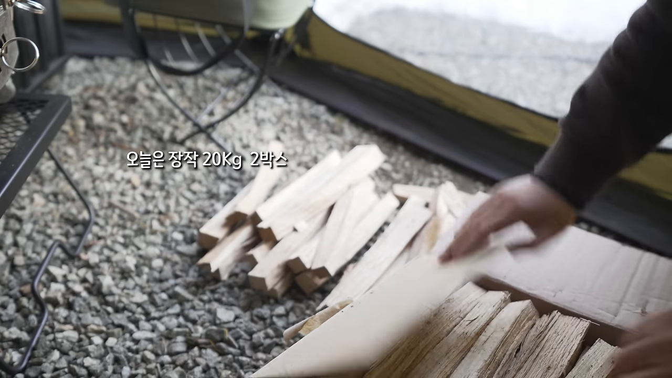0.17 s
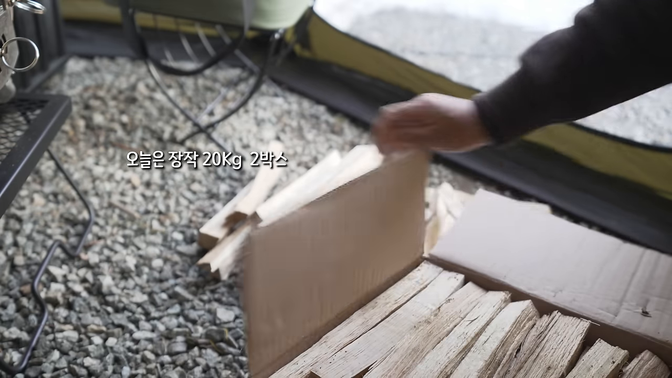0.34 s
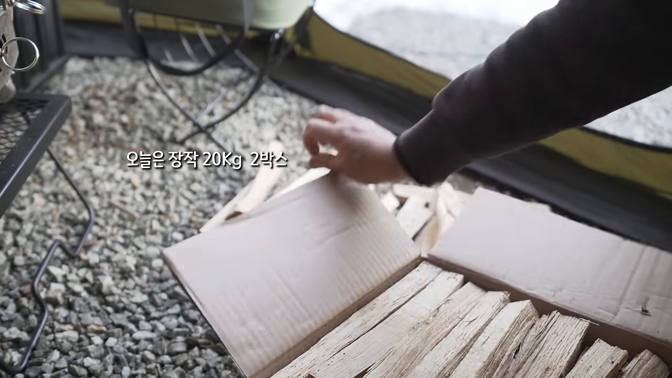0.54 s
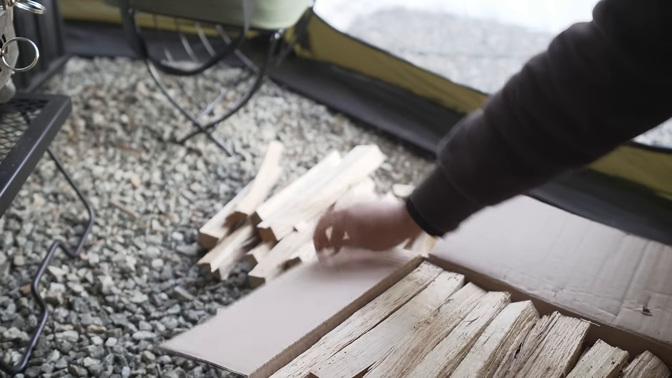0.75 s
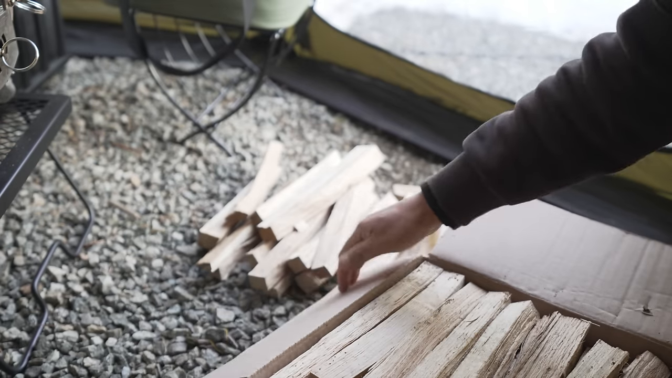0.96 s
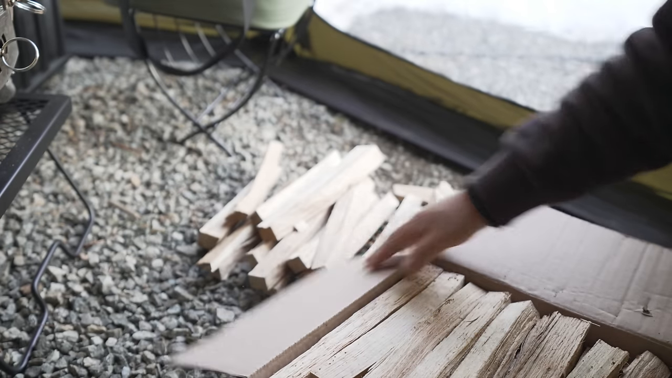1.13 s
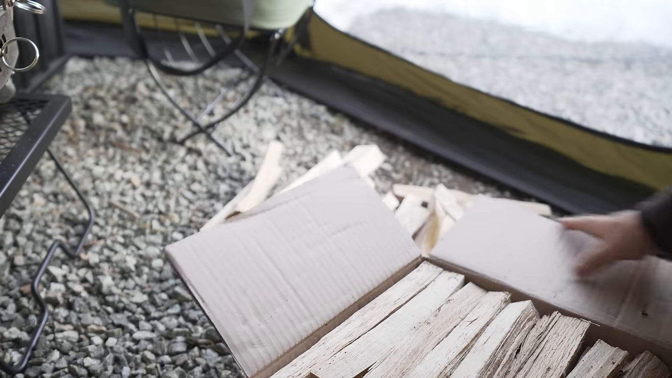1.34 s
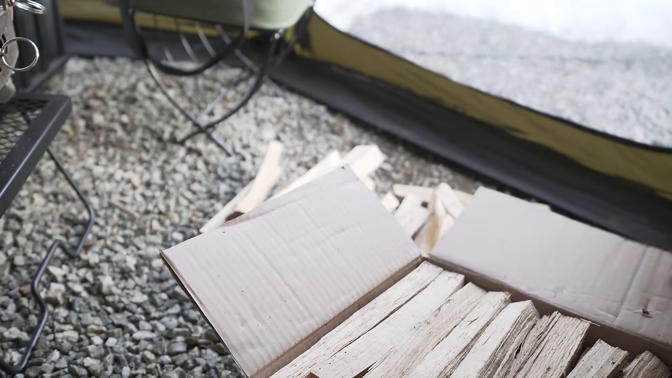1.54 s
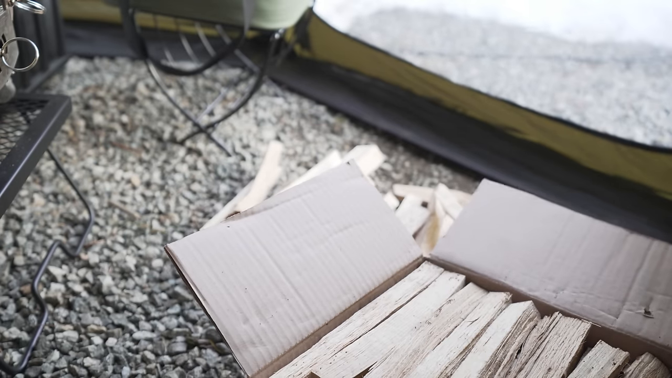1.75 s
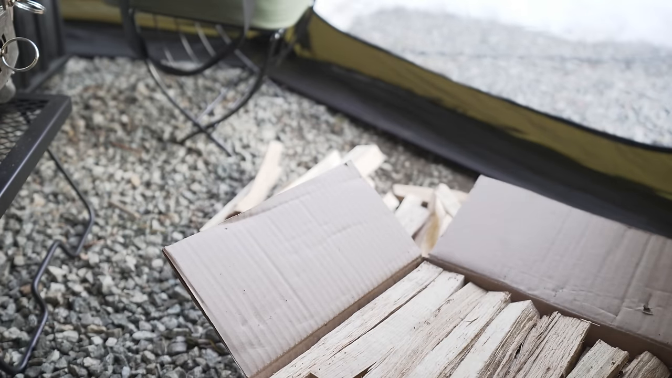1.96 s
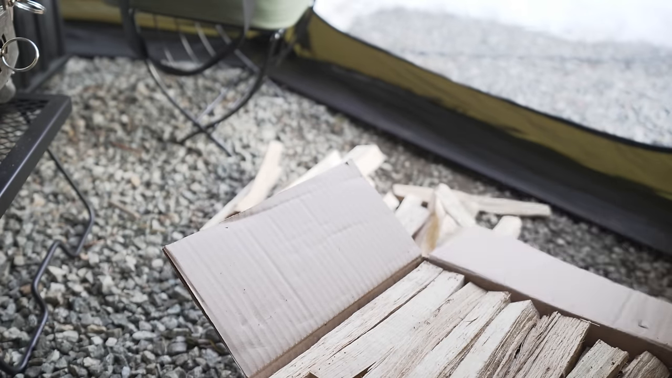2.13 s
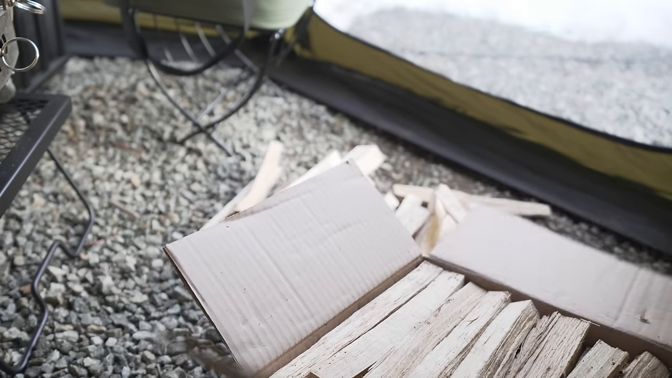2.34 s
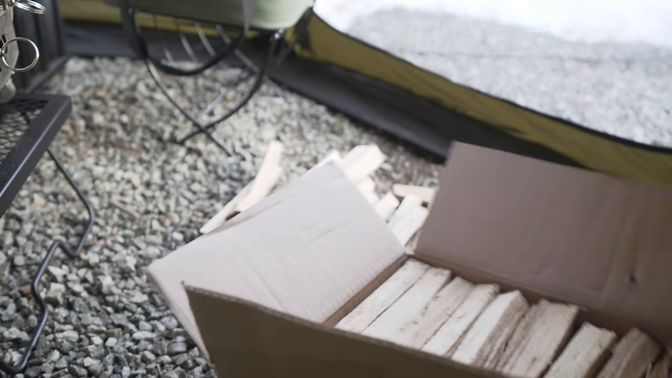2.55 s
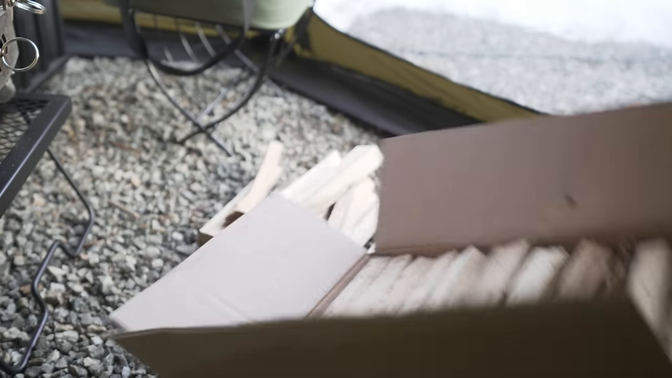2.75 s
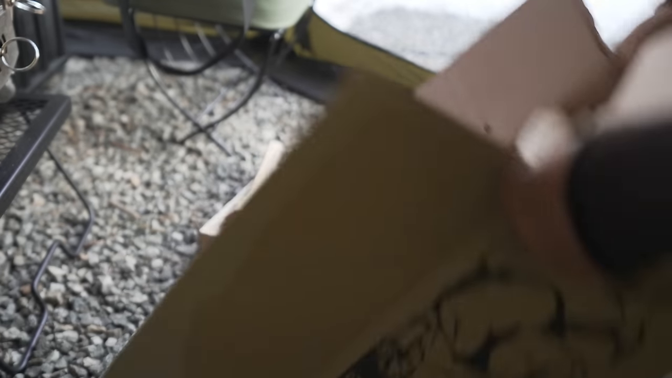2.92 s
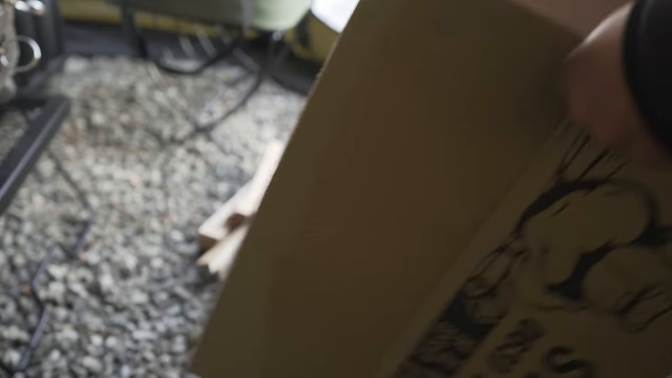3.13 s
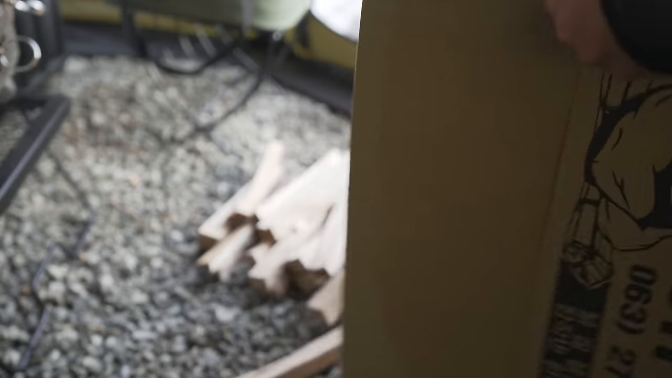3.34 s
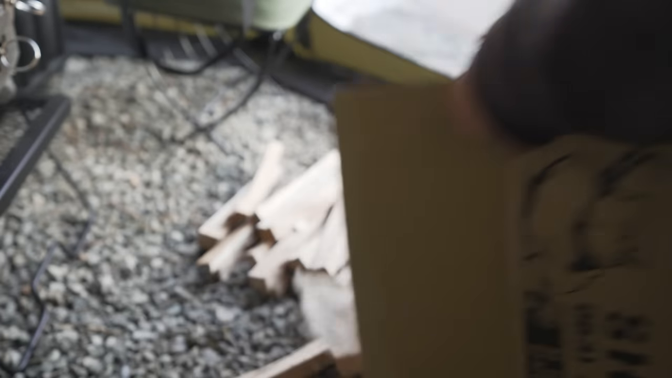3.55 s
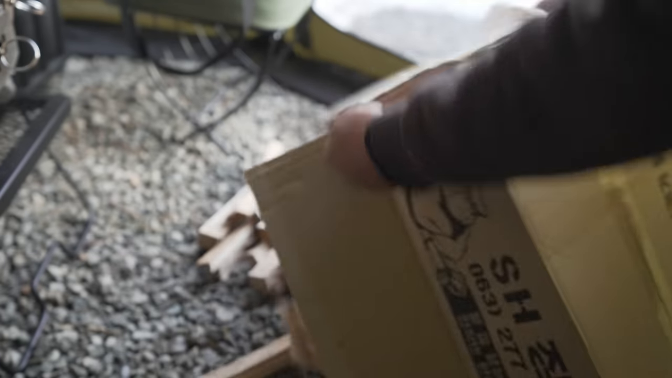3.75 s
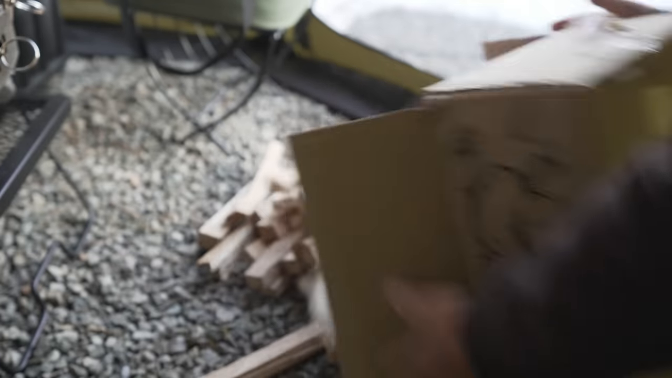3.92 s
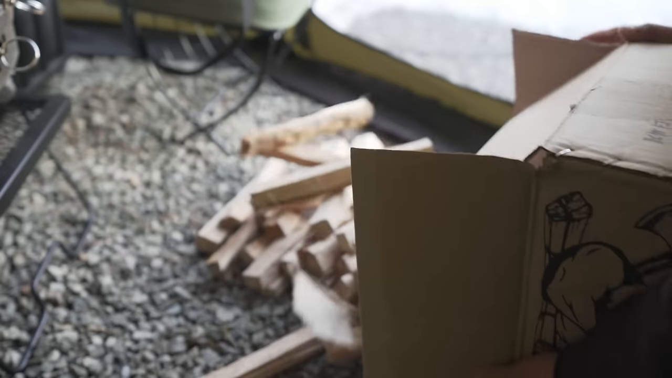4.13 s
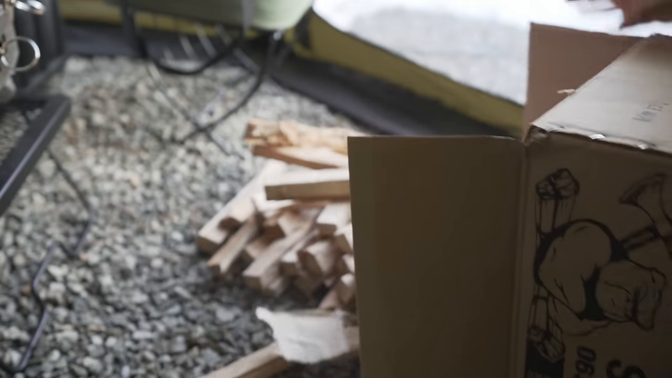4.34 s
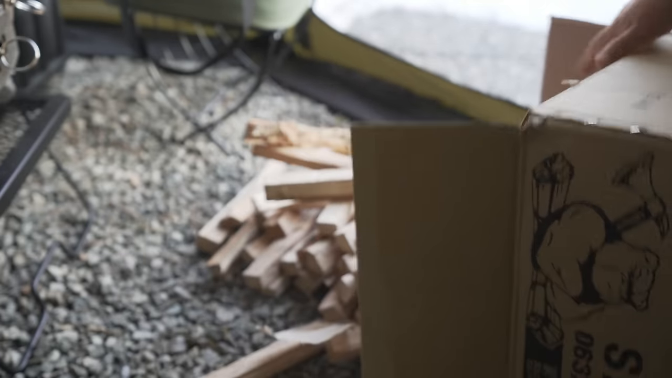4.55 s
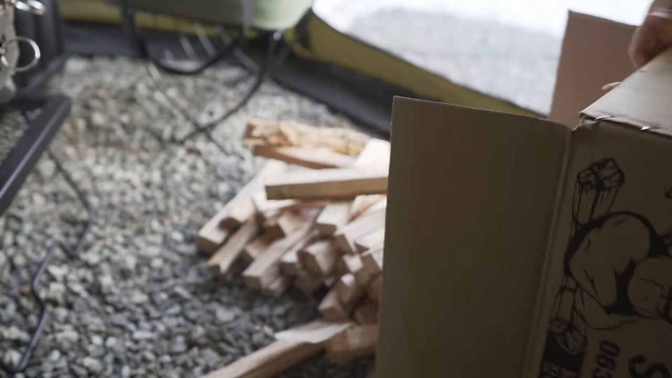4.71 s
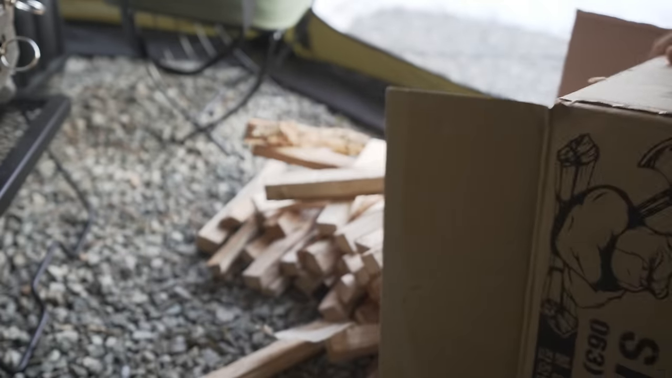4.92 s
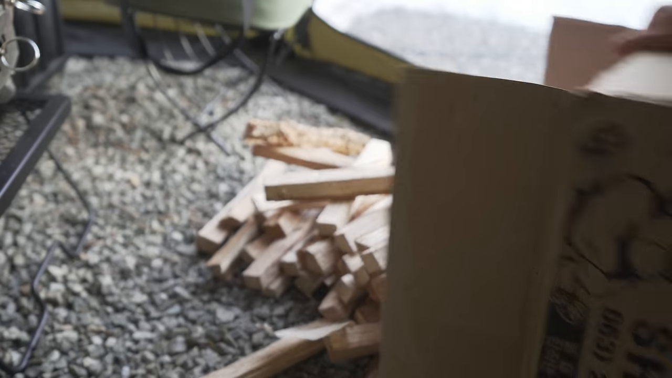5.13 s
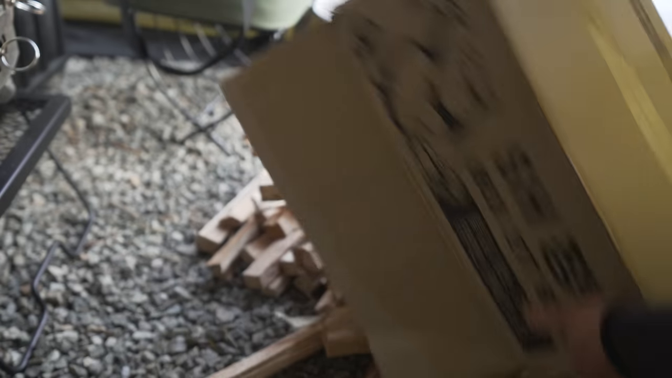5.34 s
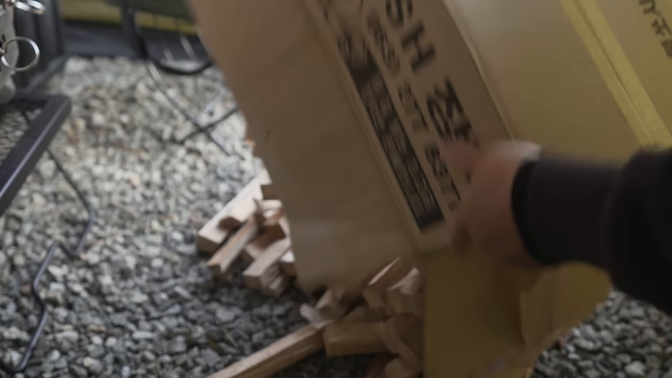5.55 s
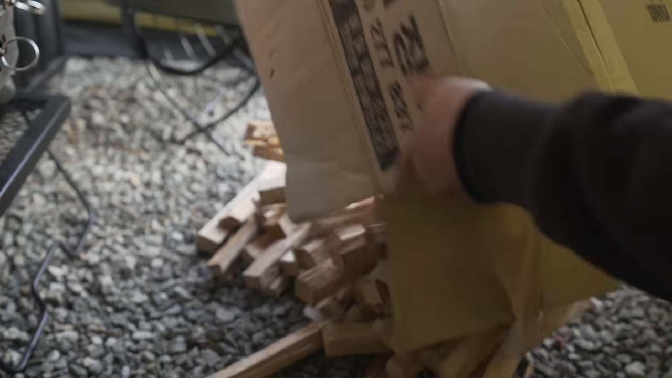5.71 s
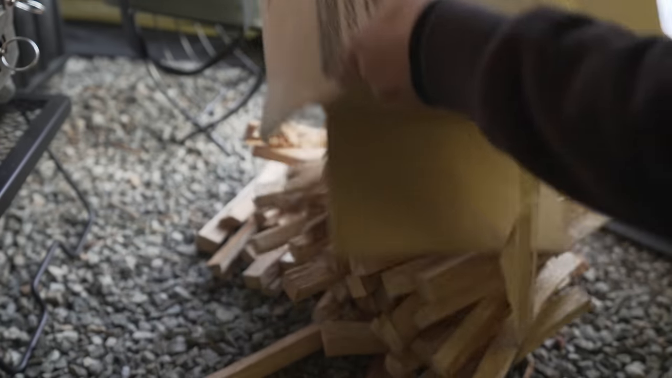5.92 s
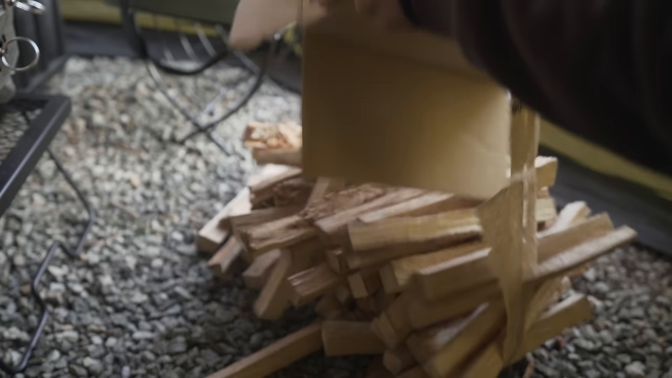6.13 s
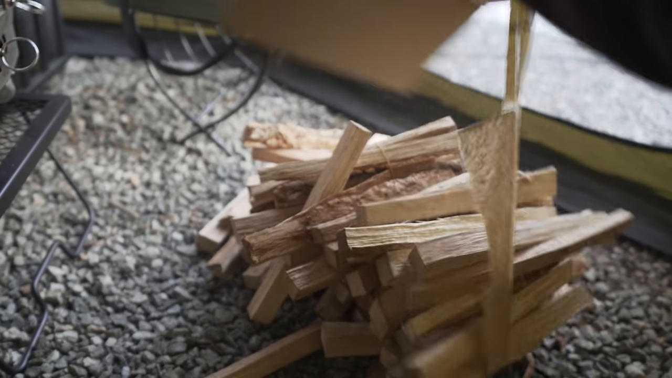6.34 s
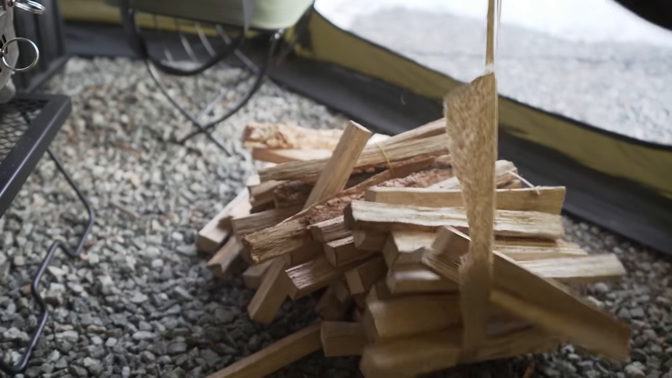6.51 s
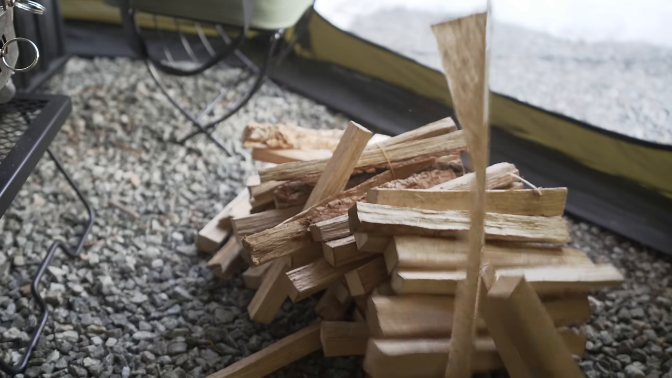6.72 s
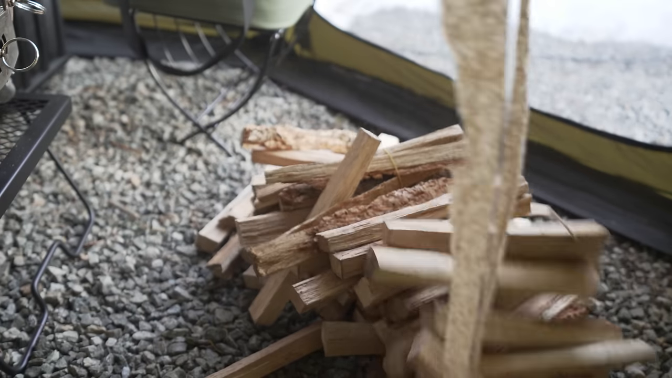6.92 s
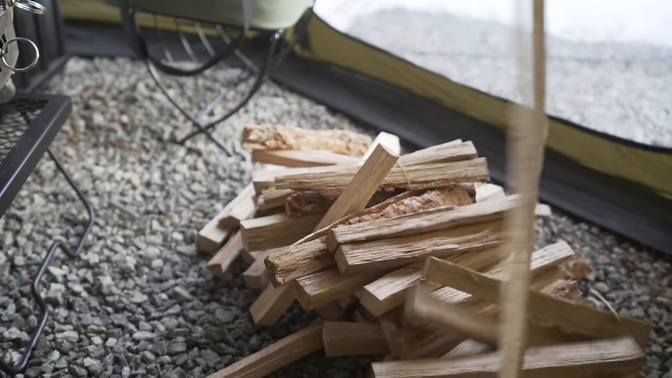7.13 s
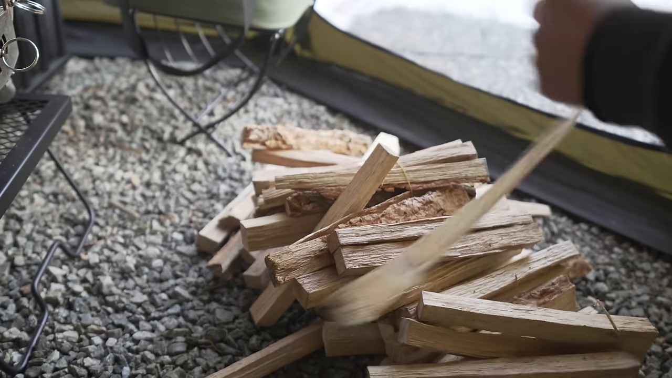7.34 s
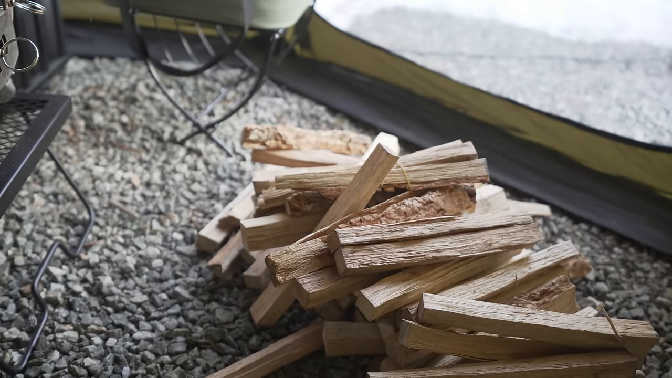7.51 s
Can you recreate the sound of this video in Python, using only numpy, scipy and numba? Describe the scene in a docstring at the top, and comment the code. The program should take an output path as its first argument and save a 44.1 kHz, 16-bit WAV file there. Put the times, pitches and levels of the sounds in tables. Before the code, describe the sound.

A cardboard box is handled, booming and rasping, before dry wood sticks knock, rattle and tumble onto a pile, close up in a tent.

```python
"""Dry woody clatter: split firewood sticks tipped from a cardboard box onto a pile on gravel, close up in a tent.
The box first booms, scuffs and rasps as it is handled; then the sticks knock, rattle and snap over it.
Knocks and panels are decaying sines; crack, thud, scuff and snap are noise bursts; rumble, rub and rasp are
shaped grit and noise. A dull tent wash and steady air lie behind, and the recorder rounds the loudest peaks."""
import sys
import numpy as np
from scipy import signal
from scipy.fft import rfft, irfft, next_fast_len
from scipy.io import wavfile
from scipy.ndimage import uniform_filter1d
from numba import njit

SR = 44100
rng = np.random.default_rng(int(sys.argv[2]) if len(sys.argv) > 2 else 0)


def put_to_file(sound):
    """Save the sound as 16-bit audio at rate SR, in the file named by the first command-line argument."""
    columns = np.atleast_2d(sound).T  # one column per channel
    safe = np.clip(columns, -1, 1)
    whole_steps = np.round(safe * 32767)
    wavfile.write(sys.argv[1], SR, whole_steps.astype(np.int16))


N = 338247

# spectrum of rough wood and card scraping: [f/Hz, relative density/dB]
RASP_SPECTRUM = [(290, -39), (500, -12.5), (1300, -3), (1770, -1), (2130, -4.5), (3750, -2.5),
                 (4660, -12.5), (8090, -12), (14000, -18.5), (16000, -21)]
WOOD_CONTACT_S = 0.00065  # build-up of a free stick's ring


def undb(db):
    """dB to amplitude."""
    return 10 ** (np.asarray(db) / 20)


def level(x, rms_db):
    """Scale to the given rms."""
    return x * undb(rms_db) / np.sqrt(np.mean(x ** 2))


def colour(x, points):
    """Filter by (f/Hz, gain/dB) points, interpolated over log frequency."""
    hz, db = np.transpose(points)
    size = next_fast_len(len(x))
    f = np.maximum(np.fft.rfftfreq(size, 1 / SR), 1)
    gain = undb(np.interp(np.log(f), np.log(hz), db))
    return irfft(rfft(x, size) * gain, size)[:len(x)]


def butter(x, order, edge_hz, kind):
    """Butterworth filter."""
    return signal.sosfilt(signal.butter(order, edge_hz, kind, fs=SR, output="sos"), x)


def band(x, low_hz, high_hz):
    """Band-pass."""
    return butter(x, 2, [low_hz, high_hz], "bandpass")


@njit
def rings(length, start_s, hz, size, t60_s, contact_s):
    """Sum of decaying sines, one per strike; each builds up while its contact lasts."""
    y = np.zeros(length)
    for k in range(len(start_s)):
        step = np.exp(2j * np.pi * hz[k] / SR - np.log(1000) / (t60_s[k] * SR))
        z = size[k] + 0j
        first = int(start_s[k] * SR)
        for n in range(first, min(first + int(t60_s[k] * SR), length)):
            y[n] += z.imag * min(1., (n - first) / (contact_s[k] * SR))
            z *= step
    return y


def bursts(s, db, t60_s):
    """Envelope that jumps at each time and decays exponentially."""
    spikes = np.zeros(N)
    np.add.at(spikes, (s * SR).astype(int), undb(db))
    return signal.lfilter([1], [1, -np.exp(-np.log(1000) / (t60_s * SR))], spikes)


def grit(rate_hz, spread_db):
    """Dense tiny slips at random times, of very uneven size; rms 1."""
    size_db = spread_db * np.minimum(rng.exponential(size=N), 4.)
    slips = rng.random(N) < rate_hz / SR
    return level(slips * undb(size_db) * rng.standard_normal(N), 0)


def flicker(rate_hz, spread_db):
    """Gain that slews between random levels, one per 1 / rate_hz."""
    k = int(SR / rate_hz)
    steps = np.repeat(rng.standard_normal(N // k + 1), k)
    return undb(spread_db * uniform_filter1d(steps, k)[:N])


def sticks(s, db, first_hz, second_hz, second_db, t60_s, contact_s):
    """A split stick bends two ways, so each of its two bending modes rings with close neighbours."""
    # modes about the first and second bending: [multiple of f, level/dB, share of t60]
    first_group = [(1, -6, 1), (.715, -18, 0.75), (1.11, -19, 0.4), (1.47, -24, 0.4)]
    second_group = [(1, -5.5, 0.56), (1.049, -9, 0.34)]
    t60_s = np.clip(t60_s, .015, .3)
    chance = np.clip(rng.standard_normal((12, len(s))), -2, 2)
    modes = [(first_hz, db, m) for m in first_group]
    modes += [(second_hz, db + second_db, m) for m in second_group]
    out = 0
    for k, (hz, group_db, (multiple, mode_db, share)) in enumerate(modes):
        loose = multiple != 1  # only neighbours vary from stick to stick
        f = hz * multiple * (1 + 0.025 * loose * chance[k])
        size = undb(group_db + mode_db + 2 * loose * chance[6 + k])
        out = out + rings(N, s, f, size, t60_s * share, contact_s + 0 * s)
    return out


def air():
    """Steady background: noise shaped by a fixed spectrum."""
    # background spectrum: [f/Hz, relative density/dB]
    air_spectrum = [(15, -42), (25, 18), (141, 14), (427, -6.5), (1070, 1.5), (3340, -56), (4870, -20),
                    (9070, -10.5), (16000, -80)]
    return level(colour(rng.standard_normal(N), air_spectrum), -48.5)


def handling():
    """Rumble, rattle and rasp levels in dB: slow course plus the power of each jolt, rising and sinking."""
    # slow course of the handling: [t/s, then relative box rumble, rattle, rasp level/dB]
    course = [(0.0, -47, -49, -51), (0.36, -53, -60, -57), (0.58, -42, -50.5, -59.5),
              (0.78, -40.5, -43.5, -50.5), (1.07, -46.5, -47.5, -56.5), (1.2, -49.5, -52, -46.5),
              (1.6, -43.5, -52, -50), (1.83, -55, -52.5, -55), (2.14, -46, -45.5, -55),
              (2.55, -45.5, -48.5, -58.5), (2.68, -41, -35, -56.5), (2.95, -31, -36.5, -41.5),
              (3.22, -38, -42, -50), (3.54, -42, -41.5, -43), (3.76, -31, -34.5, -43.5),
              (3.87, -23.5, -19, -38.5), (4.03, -27, -20, -44), (4.21, -49, -48, -55),
              (4.51, -63.5, -52.5, -59), (4.6, -41.5, -51, -52), (5.2, -44, -44, -52.5),
              (5.45, -30.5, -29.5, -41.5), (6.04, -33.5, -31.5, -46), (6.3, -41.5, -37.5, -39),
              (7.0, -47.5, -45, -62), (7.15, -39.5, -30.5, -48), (7.5, -57, -57, -43.5),
              (7.67, -54, -57, -69)]
    # jolts, box jerked or load slipping: [t/s, then relative box rumble, rattle, rasp level/dB]
    jolts = [(0.01, -54, -60, -50), (0.169, -33, -60, -47.5), (0.33, -63, -58, -45.5), (0.9, -49, -55, -57),
             (1.37, -41, -62, -59), (1.884, -41, -62, -49.5), (2.88, -27, -28, -43), (3.16, -51, -37, -44),
             (3.271, -44, -37, -40.5), (3.396, -20, -22, -33.5), (3.667, -19.5, -26.5, -35),
             (3.822, -15.5, -25, -40), (3.974, -44, -25, -26.5), (4.119, -19, -26, -39),
             (4.34, -50, -59, -46.5), (5.06, -41, -44, -42.5), (5.42, -48, -41, -37.5),
             (5.49, -29, -27, -32.5), (5.62, -21.5, -46, -37), (5.77, -28, -29, -43), (5.94, -26, -34, -31),
             (6.0, -34, -23, -32), (6.21, -32, -42, -35.5), (6.37, -53, -52.5, -39),
             (6.66, -37, -51, -38.5), (6.729, -37, -46, -36), (6.83, -50, -37, -42),
             (6.96, -56, -49, -37.5), (7.073, -34.5, -26, -41)]
    rise_db_per_s, fall_db_per_s = 264, 231
    t = np.arange(0, N, 64) / SR
    s, *slow = np.transpose(course)
    at, *peaks = np.transpose(jolts)
    since = t[:, None] - at
    shape = undb(np.where(since < 0, rise_db_per_s * since, -fall_db_per_s * since))
    levels_db = []
    for slow_db, peak_db in zip(slow, peaks):
        power = undb(2 * np.interp(t, s, slow_db)) + shape ** 2 @ undb(2 * peak_db)
        levels_db.append(np.interp(np.arange(N) / SR, t, 10 * np.log10(power)))
    return levels_db


def box(gain, count=1500):
    """Card panels boom and thud at each bump; dragged and bent, they rumble and buckle in many small pops."""
    # bumps of the box and flaps: [t/s, relative level/dB, panel f/Hz]
    bumps = [(0.045, -27, 152), (0.163, -33, 120), (0.404, -28.5, 105), (0.848, -17, 277),
             (0.893, -27.5, 175), (1.226, -30, 312), (1.252, -20, 172), (1.41, -26.5, 286),
             (1.44, -38, 383), (1.472, -31, 285), (1.511, -24, 104), (1.605, -33, 340), (1.875, -24, 126),
             (1.889, -26.5, 225), (2.068, -28.5, 181), (2.091, -30, 101), (2.133, -23.5, 180),
             (2.662, -21.5, 318), (2.811, -27, 204), (2.869, -18.5, 258), (3.005, -23, 138),
             (3.245, -5.5, 466), (3.264, -9.5, 385), (3.298, -9.5, 239), (3.469, -10, 134),
             (3.578, -15.5, 164), (3.658, -12, 181), (3.719, -11, 214), (3.761, -15, 152), (4.081, -8, 211),
             (4.565, -21.5, 106), (4.729, -28, 192), (5.06, -23, 194), (5.451, -21, 484), (5.593, -16, 127),
             (5.798, -16.5, 342), (5.938, -17, 450), (6.131, -19, 132), (6.618, -31.5, 406),
             (6.669, -28, 316), (6.706, -30, 200), (6.745, -35, 250), (6.945, -21.5, 238)]
    # card panel resonances: [f/Hz, width/Hz, level/dB]
    resonances = [(106, 570, -12), (144, 16, 2.5), (192, 103, 1), (263, 67, -1.5), (435, 260, -0.5)]
    s, db, hz = np.transpose(bumps)
    slap_hz = 250.  # bumps above it are harder: briefer contact, stronger thud; below it softer
    t60_s = 10.4 / hz  # 10.4 periods
    contact_s = 0.4 * slap_hz / hz ** 2  # 0.4 period at slap_hz
    boom = 1.35 * rings(N, s, hz, undb(db), t60_s, contact_s)
    boom += 0.3 * rings(N, s, 1.543 * hz, undb(db), 1.44 * t60_s, contact_s)

    thud_db = db + 15 * np.log10(hz / slap_hz)
    thud_envelope = uniform_filter1d(2.3 * bursts(s + 0.0011, thud_db, 0.059), size=100)
    thud = band(thud_envelope * rng.standard_normal(N), 116.0, 830.0)

    slips = grit(2000, 3.46) * flicker(25, 3.7)
    panels = 0
    for panel_hz, width_hz, panel_db in resonances:
        b, a = signal.iirpeak(panel_hz, panel_hz / width_hz, SR)
        panels = panels + undb(panel_db) * signal.lfilter(b, a, slips)
    at, size, pitch = rng.random((3, count))
    pop_hz = 91.1 * 4.5 ** pitch
    pops = rings(N, at * N / SR, pop_hz, size ** 4, 8.6 / pop_hz, 1.65 / pop_hz)
    rumble = level(level(band(panels, 36.0, 940.0), 0) + level(pops, -2.7), 0)
    return band(boom, 45.0, 3200.0) + thud + gain * rumble


def rattle(db, count=2600):
    """Sticks rub along the card; the harder they move, the more they also knock each other."""
    # spectrum of the rub: [f/Hz, relative density/dB]
    rub_spectrum = [(250, -13), (800, 4), (1300, 1.5), (2200, -2), (3300, -8), (4500, -10), (9000, -38)]
    s = rng.random(count) * (N / SR)
    chance = np.clip(rng.standard_normal((4, count)), -2, 2)
    size_db = 4.5 * np.minimum(rng.exponential(size=count), 4.)
    first_hz = 1280 * np.exp(0.2055 * chance[0])
    second_hz = 2900 * np.exp(0.1856 * chance[1])
    second_db = -5 + 3.7 * chance[2]
    t60_s = 0.1 * np.exp(0.1 * chance[3])
    ring = sticks(s, size_db, first_hz, second_hz, second_db, t60_s, WOOD_CONTACT_S)

    # the contact wanders over the card, so each half octave of the rub swells on its own
    slips = colour(grit(2500, 0.66), rub_spectrum) * flicker(35, 4.9)
    rub = 0
    for low_hz in 250 * 2 ** np.arange(0, 5, .5):
        rub = rub + band(slips, low_hz, low_hz * 2 ** .5) * flicker(28, 2.)
    knocking = 1 / (1 + undb(0.75 * (-39.5 - db)))  # 0-1, rises with level
    return undb(db) * (knocking * level(ring, 0) + (1 - 0.72 * knocking) * level(rub, 0))


def rasp(gain, rattle_db):
    """Wood and card scrape in fits and starts; fine grit comes and goes alone, coarse grit needs sliding wood."""
    card_only_db = -13.5  # coarse gain without rattle
    wood_from_db = -51.5  # rattle level that halves this cut in dB
    scrape = colour(rng.standard_normal(N) + .7 * grit(900, 4.8), RASP_SPECTRUM)
    coarse = butter(scrape, 2, 6500., "lowpass")
    fine = scrape - coarse
    wood = undb(card_only_db / (1 + undb(rattle_db - wood_from_db)))
    scrape = coarse * wood * flicker(24, 0.98) + fine * flicker(7.7, 0.25)
    return gain * level(scrape * flicker(60, 2.7), 3.03)


def scuffs():
    """Short bright brushes of a flap or hand over card: rasp-coloured noise in decaying bursts."""
    # scuffs: [t/s, relative level/dB]
    scuff_times = [(0.0428, -30), (0.1376, -30), (0.1614, -25), (0.2523, -32.5), (0.404, -30),
                   (0.7834, -27.5), (0.8945, -30), (1.228, -28), (1.361, -29), (2.617, -36), (4.5381, -38),
                   (4.6069, -28.5), (7.01, -22), (7.3615, -25), (7.6457, -30)]
    s, db = np.transpose(scuff_times)
    brush = level(colour(rng.standard_normal(N), RASP_SPECTRUM), -8.0)
    return uniform_filter1d(bursts(s, db, 0.066), size=64) * brush


def knocks(count=5):
    """Clear blows: ringing wood and a splintery crack; a jammed stick rings shorter and chatters on neighbours."""
    # knocks: [t/s, relative level/dB, first bending f/Hz, second bending f/Hz,
    #          second re first/dB, relative crack level/dB, jamming in the pile 0-1]
    blows = [(2.872, -10, 1040, 3300, -15, -30, 0.9), (3.017, -14.5, 1712, 2000, -27, -46, 0.64),
             (3.037, -12.5, 1120, 2660, -19, -53, 0.7), (3.082, -24, 1200, 2840, -1, -30, 0.3),
             (3.141, -9.5, 1733, 3230, -12, -33, 0.5), (3.16, -15.5, 1596, 3350, -7, -32.5, 0.5),
             (3.192, -22, 1330, 2000, -5, -29, 0.5), (3.317, -8, 1100, 2170, -21, -29, 1),
             (3.357, -2, 1197, 2970, -0.5, -21, 1), (3.39, -9, 1360, 2060, -2, -19, 0.46),
             (3.409, -19.5, 1790, 3560, 6.5, -41, 0.4), (3.458, -26, 1195, 2780, 7, -38, 0.4),
             (3.498, -29, 1350, 2720, 11, -44, 0.8), (3.659, -18.5, 1764, 3500, -8, -21.5, 0.5),
             (3.717, -15, 860, 3310, -3, -26, 0.95), (3.805, -8, 1350, 2170, -11, -42, 0),
             (3.818, -13, 1330, 2380, 4, -37, 0.4), (3.838, -12, 922, 2990, -13, -26, 0),
             (3.863, -4.5, 1555, 3100, -26, -29, 0), (3.908, -1.5, 1297, 2480, -9, -40, 0.76),
             (3.924, -4, 1040, 2030, -23, -45, 0.54), (3.94, -10, 1500, 2900, -12, -36, 0.3),
             (3.949, -9.5, 1810, 3340, 1, -44, 0.4), (3.975, -4, 1476, 2540, -12, -35, 0.84),
             (4.018, -4.5, 1384, 3100, -6.5, -35, 0.4), (4.095, -12.5, 1040, 3320, -13, -32, 0.6),
             (4.127, -22, 1620, 3040, 7, -37, 0.7), (4.168, -19, 1314, 2320, -4, -52, 0.3),
             (4.282, -2.5, 1252, 2880, -14, -40, 0.3), (4.771, -30, 1070, 3040, -2, -44, 0.4),
             (5.073, -36, 1450, 3750, 16, -36, 0.9), (5.478, -20, 1310, 2930, 5, -33, 0.5),
             (5.494, -14, 1300, 3000, -10, -38, 0.7), (5.509, -17, 1110, 2100, -10, -37, 0.3),
             (5.535, -10.5, 1400, 1970, -4.5, -36, 0.65), (5.56, -4, 1190, 2410, -10, -45, 0.97),
             (5.62, -10, 1140, 2980, -9, -23, 1), (5.712, -10.5, 1366, 3290, -11, -46, 0.86),
             (5.771, -8, 1130, 2530, -13, -25, 0.4), (5.818, -8, 1320, 2050, -3.5, -46, 0.76),
             (5.832, -5, 1350, 3340, -6.5, -41, 0.6), (5.843, -6, 1170, 2750, -6.5, -28, 0.7),
             (5.955, -14.5, 1093, 3350, 11, -16, 0.9), (5.972, -17.5, 1180, 3150, 8.5, -25, 0.6),
             (5.995, -9, 1910, 2920, 2.5, -20.5, 0.6), (6.019, -29, 1420, 2800, 7, -33, 0.5),
             (6.081, -12, 918, 2460, 7.5, -33, 1), (6.096, -14, 948, 2600, 7.5, -26, 0.37),
             (6.132, -17, 1350, 3380, 2, -29, 1), (6.152, -8.5, 1310, 2340, 0, -24.5, 0.46),
             (6.221, -13, 1210, 2720, -10, -40, 0.8), (6.241, -3, 1480, 2290, -9, -30, 0.5),
             (6.415, -34, 1360, 2550, 12.5, -34, 0.5), (6.438, -16.5, 1244, 2130, -5, -46, 0.6),
             (6.487, -12, 1270, 3420, -11, -31.5, 0.53), (6.515, -21, 1210, 1930, 3, -41, 0.7),
             (6.559, -20, 1320, 2010, -1.5, -33, 0.46), (6.654, -35.5, 980, 3650, 14.5, -35, 0.5),
             (6.778, -29.5, 1940, 3670, 13, -23, 0.05), (6.819, -29, 1510, 2280, 4, -42, 0.5),
             (6.847, -15, 1280, 4140, -13, -32, 1), (6.876, -9, 1322, 3070, 4.5, -20.5, 0.6),
             (6.9, -4, 1385, 3105, -3, -26.5, 0.63), (6.95, -13, 1210, 3090, 5.5, -22, 0.42),
             (7.056, -2.5, 1630, 3200, -9.5, -37, 0.93), (7.073, -2.5, 1198, 2780, -14, -25, 0.3),
             (7.109, -15.5, 1747, 2000, 2, -22, 0.23), (7.153, -18, 1620, 2860, 3.5, -32, 0),
             (7.202, -14, 1862, 2060, -13, -28.5, 0.5), (7.241, -20.5, 934, 2540, -2, -23, 0.2),
             (7.289, -12, 1062, 3280, -3, -27.5, 0.58), (7.476, -23, 1210, 3400, -7, -34.5, 0.97)]
    # spectrum of the crack: [f/Hz, gain/dB]
    crack_spectrum = [(300, -26), (1500, 12), (4000, 4.5), (8000, -5.5), (16000, -8.5)]
    s, db, first_hz, second_hz, second_db, crack_db, jammed = np.transpose(blows)
    jammed = np.clip(jammed, .02, 1)
    t60_s = 0.125 * (1 - 0.74 * jammed)
    contact_s = WOOD_CONTACT_S * (1 + 2.4 * jammed ** 2)
    wood = sticks(s, db, first_hz, second_hz, second_db, t60_s, contact_s)

    # chatter: neighbours struck up to 30 ms later, at their own pitches
    for late, size, pitch, overtone in rng.random((count, 4, len(s))):
        chatter_db = db - 1.7 * size - 3.9 * late ** 2 + 30 * np.log10(1.01 * jammed)
        chatter_first_hz = first_hz * (0.85 + .3 * pitch)
        chatter_second_hz = second_hz * (.8 + 0.296 * overtone)
        wood += sticks(s + .03 * late ** 2, chatter_db, chatter_first_hz, chatter_second_hz,
                       second_db, 0.69 * t60_s, 1.44 * WOOD_CONTACT_S)

    snap = 2.27 * uniform_filter1d(bursts(s, crack_db, 0.0058), size=24)
    splinter_tail = 0.66 * uniform_filter1d(bursts(s + 0.0012, crack_db, 0.11), size=200)
    crack = (snap + splinter_tail) * rng.standard_normal(N)
    return wood + colour(crack, crack_spectrum)


def snaps():
    """Dry snaps of splinters and tape: very short, bright noise clicks."""
    # snaps: [t/s, relative level/dB]
    snap_times = [(3.3827, -15), (3.3898, -19), (3.662, -13), (3.974, -11.5), (5.471, -22), (5.606, -21),
                  (6.205, -17), (6.2376, -21), (6.654, -22), (6.9496, -13), (7.0683, -25)]
    s, db = np.transpose(snap_times)
    envelope = 1.16 * bursts(s, db, 0.006)
    return band(envelope * rng.standard_normal(N), 3100.0, 13700.0)


def tent(x):
    """Cloth walls and gravel return a short, dull wash: convolution with a decaying noise tail."""
    t60_s, wash_db = 0.15, -20.5
    t = np.arange(int(.15 * SR)) / SR
    tail = rng.standard_normal(len(t)) * (t > .003) * undb(-60 * t / t60_s)
    tail = colour(tail, [(100, 5.0), (3000, -4.0), (12000, -7.0)])
    tail *= undb(wash_db) / np.sqrt(np.sum(tail ** 2))
    return signal.fftconvolve(x, tail)[:N]


def scene():
    """Near sources, their tent wash and the air, as one channel."""
    rumble_db, rattle_db, rasp_db = handling()
    near = box(undb(rumble_db)) + rattle(rattle_db) + rasp(undb(rasp_db), rattle_db)
    near = near + scuffs() + knocks() + snaps()
    return (near + tent(near) + air())[None]


def record(dry):
    """The microphone drops the deep bass, peaks are rounded off, then the top is cut."""
    ceiling, top_hz = 0.9, 15800
    thin = butter(dry, 2, 55., "highpass")
    rounded = ceiling * np.tanh(thin / ceiling)
    return signal.sosfilt(signal.ellip(10, .2, 60, top_hz, fs=SR, output="sos"), rounded)


dry = scene()
out = record(dry)
put_to_file(out)
```